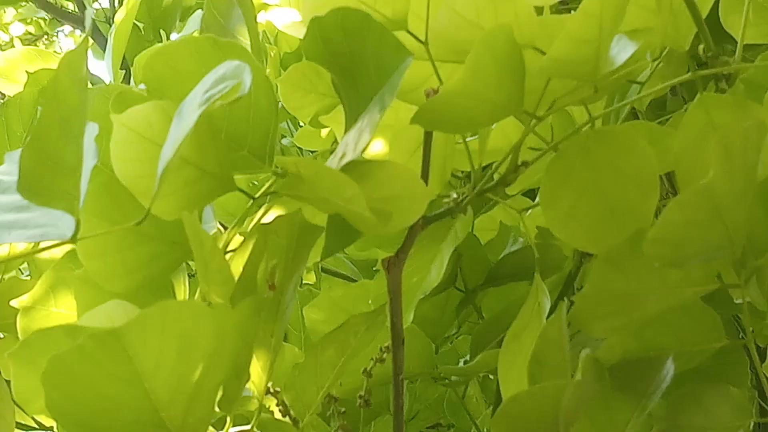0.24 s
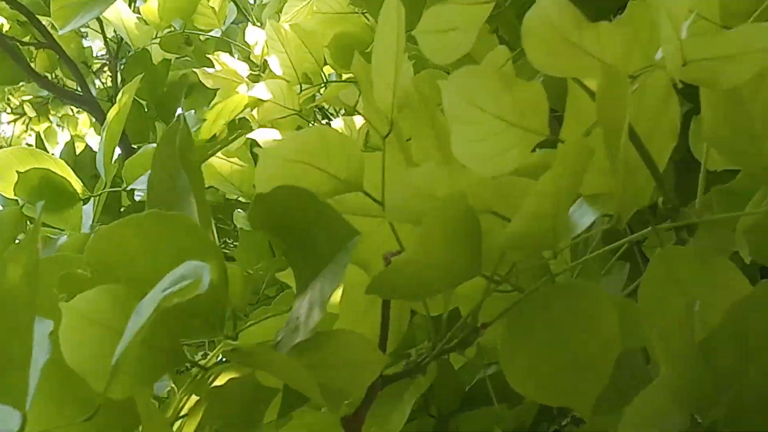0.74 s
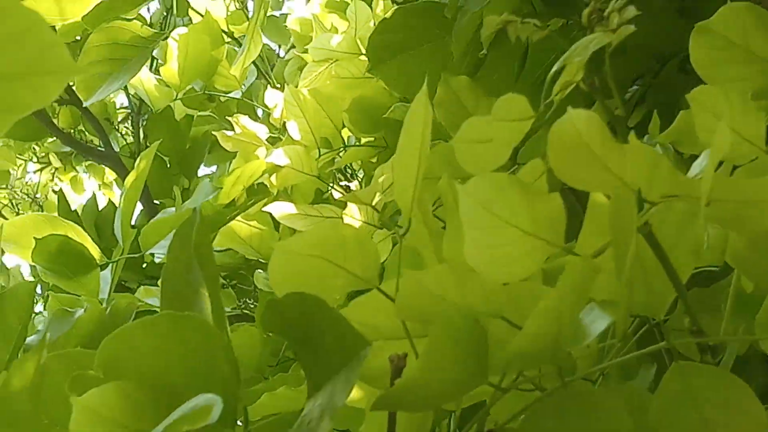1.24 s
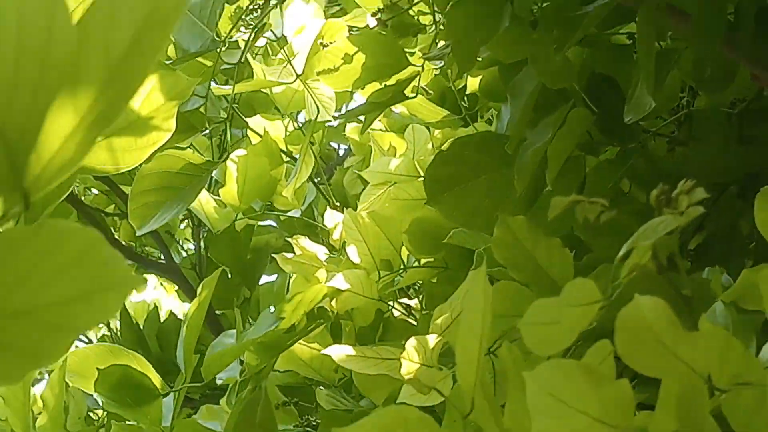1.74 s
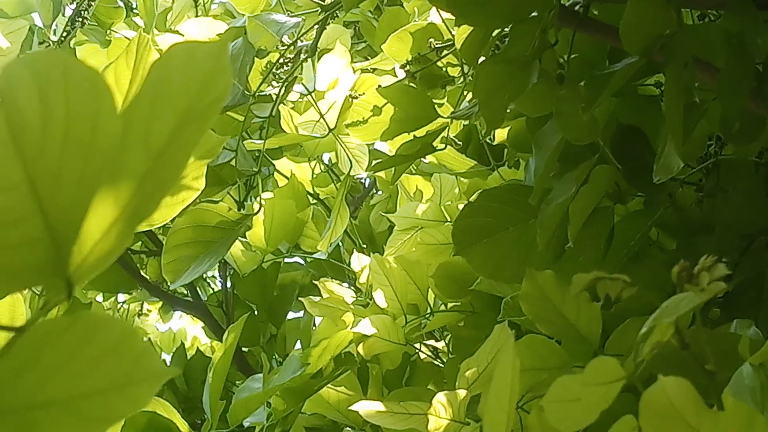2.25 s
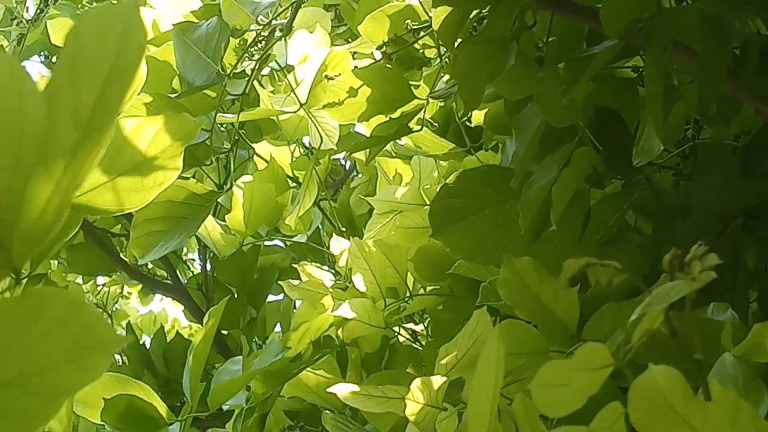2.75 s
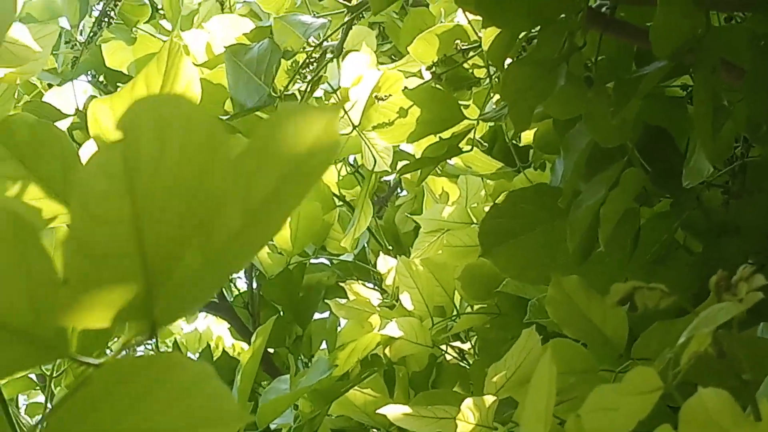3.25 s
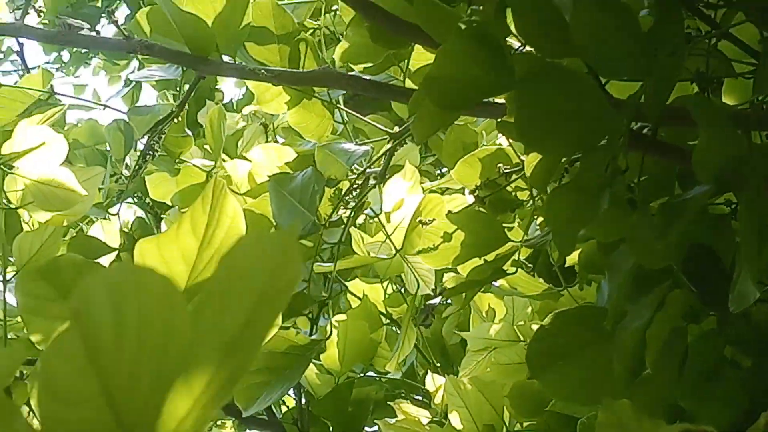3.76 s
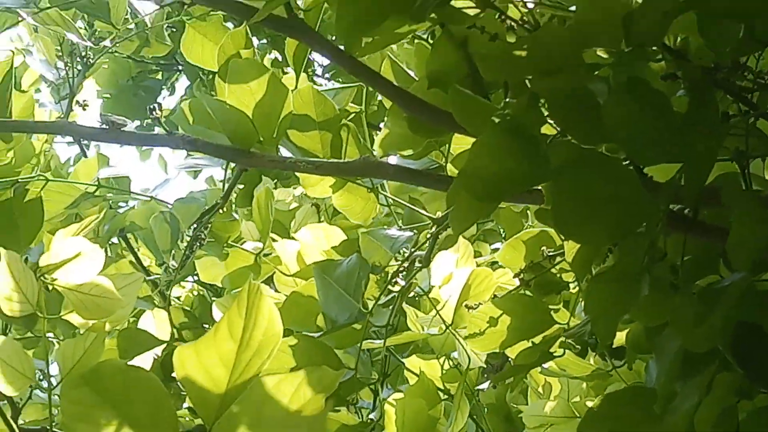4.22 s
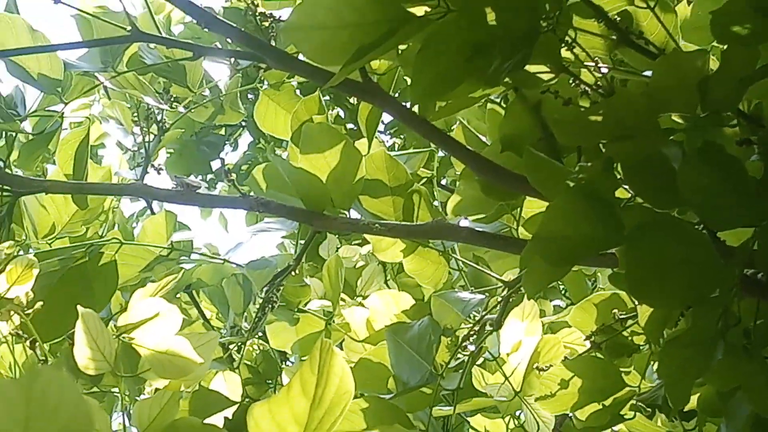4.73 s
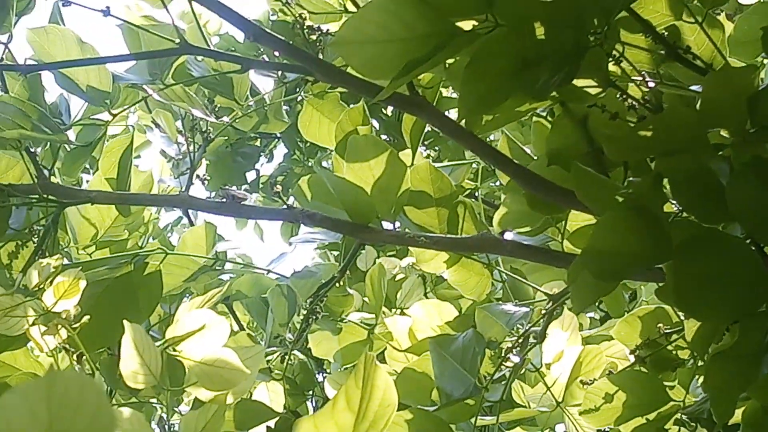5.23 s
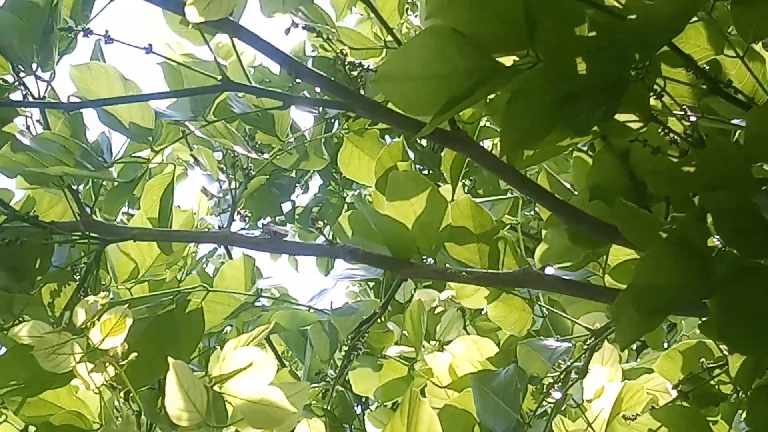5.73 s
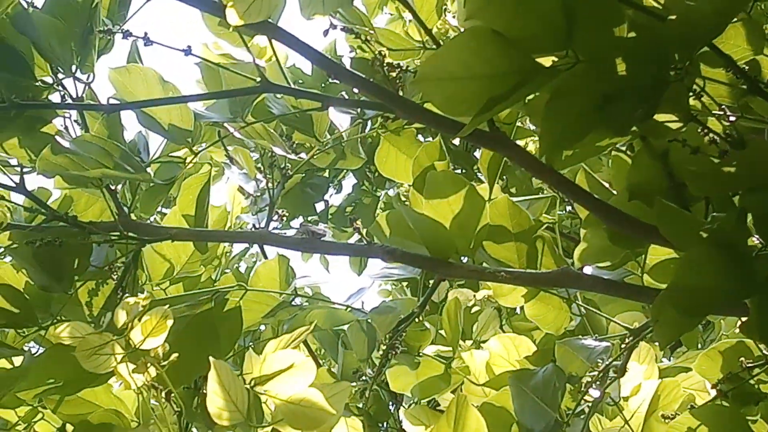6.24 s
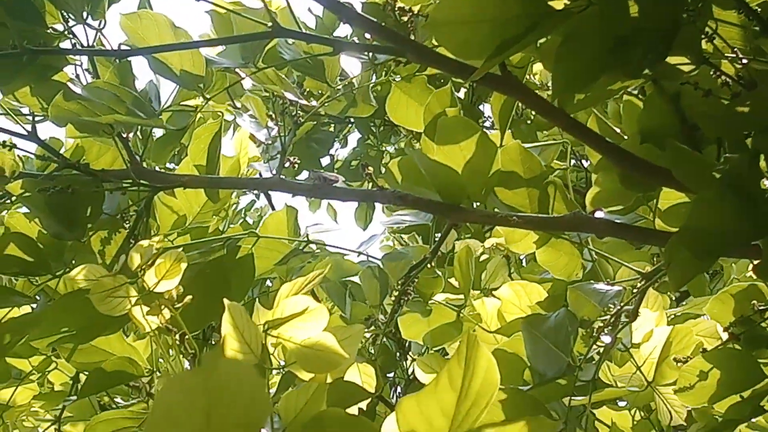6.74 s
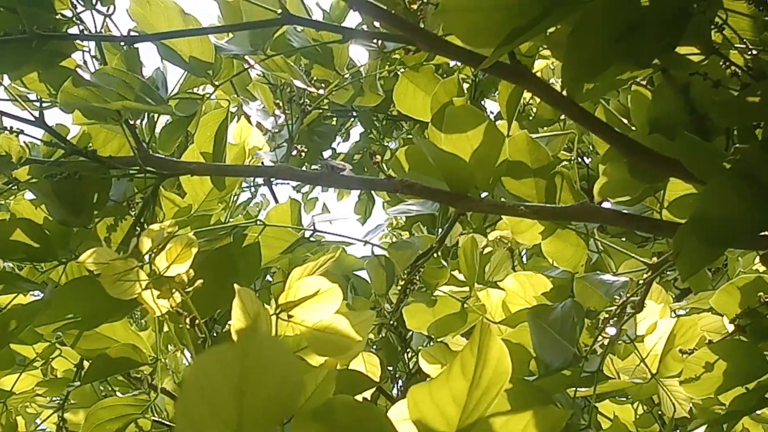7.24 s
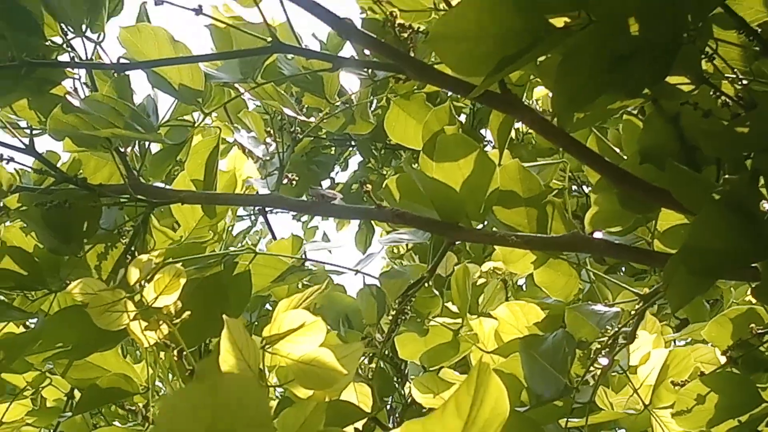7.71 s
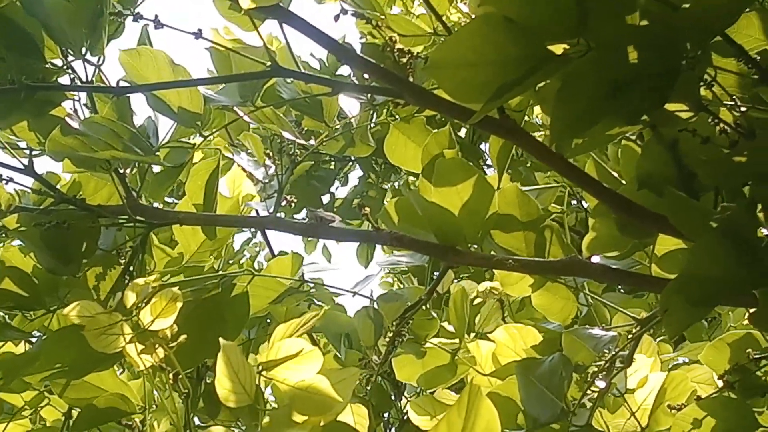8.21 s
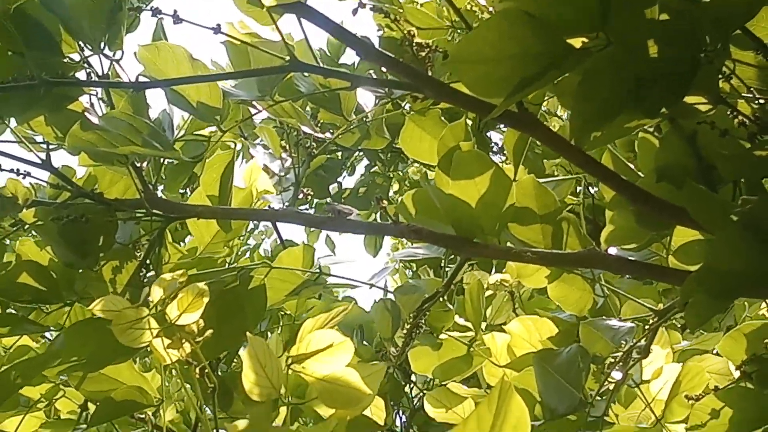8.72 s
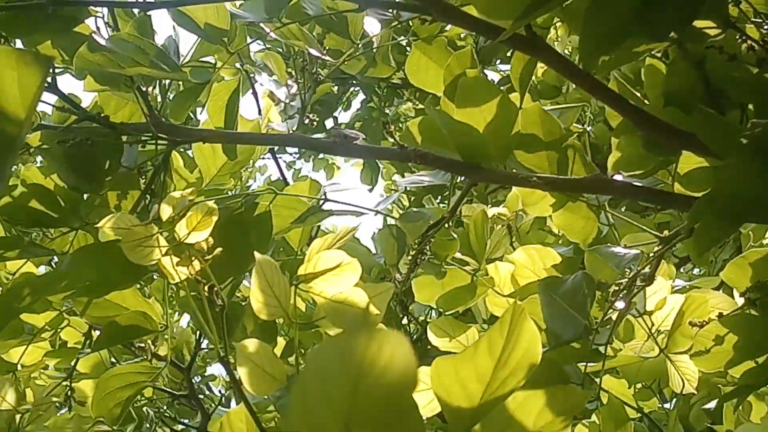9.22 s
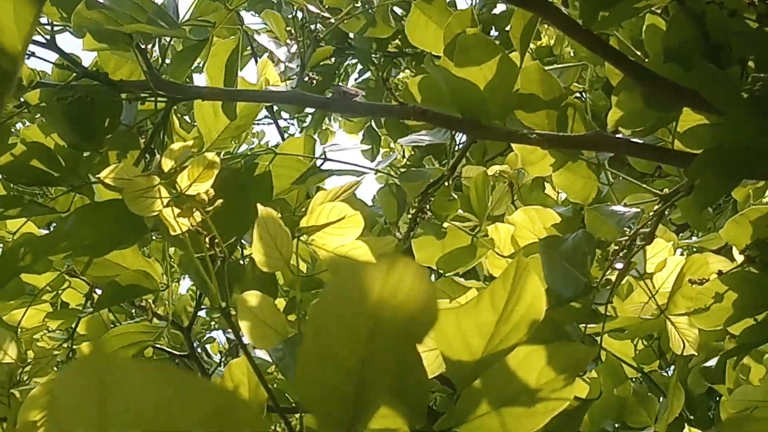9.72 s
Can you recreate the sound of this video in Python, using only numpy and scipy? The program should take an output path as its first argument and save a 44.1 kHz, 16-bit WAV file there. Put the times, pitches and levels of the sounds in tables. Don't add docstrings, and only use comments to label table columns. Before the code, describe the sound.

A close handheld microphone among trees catches one continuous, piercing cicada buzz with a fast, rough flutter, dominating from start to finish. Early on, deep wind puffs thud beneath it; later the low end is quiet apart from light sleeve rubs. Small dry clicks of leaves, duller wooden knocks and thin twig snaps scatter irregularly. Far behind lie soft traffic wash, faint hoots and early bird whistles. A finger taps the case at the end.

```python
import sys
import numpy as np
from scipy import signal
from scipy.fft import rfft, irfft, next_fast_len
from scipy.io import wavfile
from scipy.ndimage import uniform_filter1d

SR = 44100
rng = np.random.default_rng(int(sys.argv[2]) if len(sys.argv) > 2 else 0)


def output_pcm(signal):
    pcm = np.clip(np.atleast_2d(signal).T, -1, 1) * 32767
    wavfile.write(sys.argv[1], SR, np.round(pcm).astype(np.int16))


def attenuation_scalar(level_db):
    decades = np.asarray(level_db, float) / 20
    return 10 ** decades


N = 439677

# [f/Hz, density/dB per Hz]
AIR_SPECTRUM = [(15, -44), (25, -14), (92, 2), (147, -4.5), (201, -0.5), (280, -5), (1060, -7.5),
                (1580, -13), (2200, -7.5), (2570, -10.5), (2940, -6), (4010, -9), (5000, -2), (6500, -31),
                (11000, -120)]
# [t/s, length/s, f/Hz, level/dB]
HOOTS = [(1.82, 0.17, 520, -59), (2.095, 0.13, 2400, -55.5), (2.5, 0.16, 500, -59.5),
         (2.516, .12, 747, -61), (2.932, 0.28, 679, -60.5), (3.047, 0.33, 343.5, -55),
         (6.479, .16, 690, -62), (8.37, 0.15, 440, -57), (8.49, 0.29, 714, -62), (1.478, .06, 2550, -58)]
# [t/s, level/dB]
CHIRPS = [(1.42, -64), (1.7, -63), (1.97, -61), (2.22, -62), (2.46, -64), (2.7, -65)]
# [peak t/s, level/dB, time to fall 10 dB/s]
GUSTS = [(.055, -25.5, 0.07), (.225, -25, 0.06), (.33, -29.5, .07), (.49, -34.5, 0.1), (.7, -30.5, 0.05),
         (.84, -21, 0.07), (.94, -19, 0.13), (1.03, -18, 0.0843), (1.14, -24, .07), (1.23, -31, 0.02),
         (1.39, -39.5, -0.1), (2.53, -35, 0.06), (2.75, -32.5, 0.1), (2.86, -32.5, 0.13), (3.01, -42, 0.02),
         (3.14, -45, 0.2), (3.33, -49, 0.5), (3.48, -43.5, 0.15), (3.61, -43, 0.1)]
# [peak t/s, level/dB, time to fall 10 dB/s]
SLEEVE = [(3.11, -52, 0.2), (3.33, -48.5, 0.25), (3.54, -46, 0.17), (3.78, -39.5, 0.16), (3.98, -49, 0.3),
          (4.385, -50, 0.1), (4.62, -49, 0), (7.545, -50, 0.1), (7.62, -56, .02), (9.901, -42.5, 0.2)]
# [t/s, peak level/dB, f/Hz, share of snap]
LEAF_TICKS = [(0.1855, -25, 2190, 0.7), (0.562, -18, 3050, 0.7), (0.6281, -19, 2640, 0.63),
              (0.761, -22, 3940, 0.5), (0.9216, -19, 2160, 0.7), (2.283, -21.5, 3100, 0.48),
              (2.6179, -22, 2750, 0.61), (3.1976, -21, 2920, 0.38), (3.4034, -20, 4460, 1),
              (3.551, -19, 2900, 0.7), (3.643, -24, 2200, 0.98), (4.9555, -19, 3000, 0.39),
              (5.156, -24, 3130, 0.44), (5.254, -21, 2500, 1), (5.4296, -25, 3140, 0.53),
              (6.0313, -21, 2950, 0.32), (6.222, -18.5, 2800, 0.45), (6.364, -18.5, 2920, 0.81),
              (6.494, -21.5, 2050, 0.7), (6.544, -19, 3350, 0.61), (6.6288, -15.5, 3560, 0.64),
              (6.9631, -23, 2780, 0.7), (7.046, -16, 2160, 0.58), (7.393, -22, 3190, 0.63),
              (7.9483, -20.5, 2980, 0.99), (8.0965, -24, 3810, 0.95), (8.906, -21, 2920, 0.61),
              (9.1378, -20.5, 4000, 0.87), (9.1773, -21, 2290, 0.7), (9.616, -22, 2150, 0.48)]
# [t/s, peak level/dB, f/Hz]
KNOCKS = [(1.955, -35, 999), (2.09, -33, 1010), (2.175, -32, 1170), (4.813, -31, 770), (5.575, -39, 1100),
          (6.849, -34, 786), (7.376, -31, 618), (7.639, -28, 1160), (8.007, -30, 1150)]
# [t/s, peak level/dB]
TWIG_SNAPS = [(.562, -22), (1.25, -23), (2.245, -20), (5.256, -20), (6.627, -27), (7.446, -15),
              (9.178, -18)]
# (t/s, peak level/dB, duration/ms)
FINGER_TAP = (9.7955, -11.5, 0.42)
# [t/s, jump/cycles per s]
SURGES = [(-.3, 1), (.16, 1.6), (.58, .8), (1.02, 2.8), (1.61, 1), (2.19, .8), (2.59, .5), (2.96, 2.2),
          (3.22, 1.9), (3.65, .6), (4.1, 1), (4.82, 2.5), (4.94, 1.6), (5.5, .8), (6.28, 1.3), (6.57, .9),
          (7.06, 1), (7.35, 1.2), (7.58, 1.4), (8.1, .8), (8.98, .6), (9.17, 1.2)]
# [delay/ms, favoured f/Hz, level/dB]
RIBS = [
    (0, 7300, 0.5),
    (0.549, 8400, -9),
    (1.152, 8400, -12),
    (1.797, 8850, -3),
]
# [f/Hz, density/dB per Hz]
BODY = [(2470, -53), (4200, -28), (4980, -41), (5250, -12.5), (5770, -14.5), (6540, -11.5), (7100, -8.5),
        (8180, 4), (8640, -5), (9580, -11), (10200, -18), (12700, -25), (14800, -25), (15500, -37.5)]
# [f/Hz, width/Hz, lift/dB]
RINGS = [(5070, 77, -8), (6415, 390, 10), (6500, 120, -5), (6903, 140, 13.5), (7300, 250, 8.5),
         (7940, 280, 9), (8400, 550, 7.5), (8868, 175, 11.5), (10000, 370, 8), (10520, 210, 9),
         (10800, 133, 12.5), (11500, 230, 7), (12370, 150, 8.5), (13600, 790, -2), (14200, 250, 3),
         (14600, 300, 9), (15250, 250, 8), (15500, 320, 11)]
# [t/s, nearness/dB, facing/dB, place of second membrane/cycles]
MIC_PATH = [(0, -3, -1, 0.43), (.55, -2.5, 3.5, 0.44), (1.0, -4.5, 5.5, 0.44), (1.6, -3, -2, 0.42),
            (1.9, -4.5, -2, 0.44), (2.8, -2.5, -3, 0.47), (3.3, 1.5, -3.3, 0.44), (3.65, 1.7, -3, 0.48),
            (3.85, 2.5, 1.5, .53), (4.5, 0, 1, 0.44), (4.9, 3, 1, 0.47), (5.6, -1.5, 1, .45),
            (6.2, 0, 0.5, .45), (6.4, 3.5, 2.5, 0.47), (7.3, 0.3, 0.5, .45), (8.2, 3, .4, 0.48),
            (8.9, 0.5, 1.4, .43), (9.9, 0.4, -3, .5)]
# [level/dB, share of nearness, share of facing]
SONG_PARTS = [
    (-36.5, 0.47, 0.38),
    (-21, 0.54, -0.63),
    (-18, 0.4, -0.29),
    (-18.5, 0.18, 0.44),
    (-32, 0.47, -.09),
]


def read(points, hz):
    f, value = np.transpose(points)
    return np.interp(np.log(hz + 1), np.log(f + 1), value)


def evened(x):
    return x / np.sqrt(np.mean(x ** 2) + 1e-20)


def smooth_twice(x, size):
    return uniform_filter1d(uniform_filter1d(x, size=size), size=size)


def step_up(hz, at_hz, width_hz):
    return 1 / (1 + np.exp((at_hz - hz) / width_hz))


def drift(t, top_hz, count):
    f = np.geomspace(top_hz / 20, top_hz, num=12)[:, None, None]
    phase = rng.random((12, count, 1))
    return np.sin(2 * np.pi * (f * t + phase)).sum(axis=0) / np.sqrt(6)


def clicks(seconds, sizes):
    at, near = seconds * SR + 16, np.arange(-8, 9)
    offset = near - (at % 1)[:, None]
    pulse = sizes[:, None] * np.sinc(offset) * np.cos(np.pi * offset / 20) ** 2
    places = at.astype(int)[:, None] + near
    return np.bincount(places.ravel(), pulse.ravel(), N + SR)[16:N + 16]


def shaped(points):
    size = next_fast_len(N)
    gain = attenuation_scalar(read(points, np.fft.rfftfreq(size, 1 / SR)))
    return evened(irfft(rfft(rng.standard_normal(size)) * gain, size)[:N])


def add(mix, s, sound):
    part = mix[round(s * SR):][:len(sound)]
    part += sound[:len(part)]


def air():
    hum_hz, hum_db, air_db, gusty_db = 101, -56, -40.5, 4.0
    slow = np.arange(0, N + 441, 441) / SR
    t = np.arange(N) / SR
    swell, waver, throb, stir = (np.interp(t, slow, c) for c in drift(slow, 16, count=4))
    hum = attenuation_scalar(hum_db + 2.0 * throb) * np.sin(2 * np.pi * np.cumsum(hum_hz + 2.3 * waver) / SR)
    wash = shaped(AIR_SPECTRUM)
    traffic = signal.sosfiltfilt(signal.butter(2, 1600, fs=SR, output="sos"), wash)
    hiss = attenuation_scalar(gusty_db * np.tanh(stir) - 1.0) * (wash - traffic)
    return attenuation_scalar(air_db - 1.5) * (attenuation_scalar(0.83 * swell) * traffic + hiss) + hum


def horns():
    out = np.zeros(N)
    for s, length, hz, db in HOOTS:
        t = np.arange(round(length * SR)) / SR
        add(out, s, attenuation_scalar(db + 12) * np.sin(2 * np.pi * hz * t) * signal.windows.tukey(len(t), .5))
    return out


def bird():
    low_hz, high_hz, chirp_s = 4150, 4980, .14
    out, u = np.zeros(N), np.linspace(0, 1, round(chirp_s * SR))
    for s, db in CHIRPS:
        hoarse_hz = 2000 * uniform_filter1d(rng.standard_normal(len(u)), size=150)
        hz = low_hz + (high_hz - low_hz) * np.sin(np.pi / 2 * u) + hoarse_hz
        whistle = np.sin(2 * np.pi * np.cumsum(hz) / SR) * np.sin(np.pi * u) ** .7
        add(out, s, attenuation_scalar(db + 12) * whistle)
    blur = rng.standard_normal(3000) * np.exp(-np.arange(3000) / SR / .02)
    return out + 3.0 * signal.oaconvolve(out, blur / np.linalg.norm(blur))[:N]


def swells(t, rows):
    s, db, fall = np.transpose(rows)[:, :, None]
    u = (t - s) / np.maximum(fall, .01)
    rise_share = 0.85
    power = attenuation_scalar(db - 10 * np.maximum(u, -u / rise_share)) ** 2
    return 10 * np.log10(power.sum(axis=0) + 1e-12)


def wind():
    lumpy_db = 3.5
    frames, hz = N // 256 + 5, np.fft.rfftfreq(1024, 1 / SR)[:, None]
    t = np.arange(frames) * 256 / SR
    gust_db = swells(t, GUSTS)
    corner_hz = 145 * attenuation_scalar(0.32 * (np.maximum(gust_db, -60) + 32.5))
    gust = 1 / (1 + (hz / corner_hz) ** 3.74)
    gain = gust / np.sqrt((gust ** 2).sum(axis=0)) * attenuation_scalar(gust_db)
    rub = (hz / 300) ** 2.97 / (1 + (hz / 330) ** 5.0)
    gain += rub / np.linalg.norm(rub) * attenuation_scalar(swells(t, SLEEVE) - 1.0)
    a, b = rng.standard_normal((frames, 513, 2)).T
    rumble = signal.istft(gain * (a + 1j * b), nperseg=1024, noverlap=768)[1][:N]
    lumps = evened(smooth_twice(rng.standard_normal(N), 350))
    low_cut = signal.butter(3, 70, "high", fs=SR, output="sos")
    return signal.sosfilt(low_cut, attenuation_scalar(5.0 + lumpy_db * lumps) * rumble)


def tick(hz, cycles, snap):
    t = np.arange(900) / SR
    modes = np.sin(2 * np.pi * hz * t) + .3 * np.sin(2 * np.pi * 1.5 * hz * t)
    noise = uniform_filter1d(rng.standard_normal(len(t)), size=4)
    crack = signal.lfilter([1, -1], [1, -.8], noise) * np.exp(-t / 0.00087)
    return modes * np.tanh(t * hz / 2) * np.exp(-t * hz / cycles) + 2.1 * np.maximum(snap, 0) * crack


def crackle():
    per_s, level_db, spread_db, lift_db = 150.0, -50.5, 5.5, 12
    out = np.zeros(N)
    clumps = attenuation_scalar(6.0 * evened(uniform_filter1d(rng.standard_normal(N), 1400)))
    tick_db = level_db + spread_db * np.minimum(rng.exponential(1, N), 2.5)
    size = attenuation_scalar(tick_db) * (rng.random(N) < per_s / SR * clumps)
    leaf = rng.integers(0, 16, size=N)
    for k, hz in enumerate(np.geomspace(1400, 5000, num=16)):
        grain = tick(hz, cycles=5, snap=.15) * attenuation_scalar(lift_db / (1 + ((hz - 2700) / 900) ** 2))
        out += signal.oaconvolve(size * (leaf == k), grain)[:N]
    return out


def leaves():
    out = np.zeros(N)
    for s, db, hz, snap in LEAF_TICKS:
        add(out, s, attenuation_scalar(db - 0.5) * tick(hz, cycles=5, snap=snap))
    for s, db, hz in KNOCKS:
        add(out, s, attenuation_scalar(db) * tick(hz, cycles=5.8, snap=0.048))
    for s, db in TWIG_SNAPS:
        burst = signal.lfilter([1, -1], [1, -.7], rng.standard_normal(299))
        add(out, s, attenuation_scalar(db) * burst * np.exp(-np.arange(299) / SR / .0011))
    out += crackle()
    echo_s = np.r_[0, rng.uniform(.002, .02, 8)]
    echo_size = np.r_[1, .12 * rng.choice([-1., 1.], 8)]
    out = signal.oaconvolve(out, clicks(echo_s, echo_size)[:1000])[:N]
    tap_s, tap_db, tap_ms = FINGER_TAP
    u = np.arange(400) / SR / (0.00085 * tap_ms)
    add(out, tap_s, attenuation_scalar(tap_db) * (1 - u) * np.exp(-u) * np.tanh(7.1 * u))
    return out


def muscle(t):
    rest_hz, surge_s, sag_s, flutter_hz = 206.8, .06, .45, .25
    slow = t[::441]
    s, jump = np.transpose(SURGES)[:, :, None]
    rise = np.clip((slow - s) / surge_s + 1, 0, 1)
    lift = jump * rise * np.exp(-np.maximum(slow - s, 0) / sag_s)
    flutter = flutter_hz * drift(slow, 10, count=1)[0]
    return np.interp(t, slow, rest_hz + lift.sum(axis=0) + flutter)


def ring(gain_db):
    sweep_ms_per_khz = 0.27
    khz = np.fft.rfftfreq(4096, 1000 / SR) - 8
    sweep = np.exp(-1j * np.pi * sweep_ms_per_khz * khz ** 2)
    return np.roll(irfft(attenuation_scalar(gain_db) * sweep), 1024)[:2048] * np.hanning(2048)


def rib_snaps(beat, place, delay_ms, rib_db):
    wander_ms, shake_ms, uneven, second_db = .028, 0.007, 0.13, -1.5
    train = np.zeros(N)
    for start, side_db in ((0, 0), (place / 208, second_db)):
        wander = drift(beat, 0.5915, count=1)[0]
        shake, size = rng.standard_normal((2, len(beat)))
        late = 1e-3 * (delay_ms + wander_ms * wander + shake_ms * shake)
        train += clicks(np.maximum(beat + start + late, 0), attenuation_scalar(rib_db + side_db) * (1 + uneven * size))
    return train


def abdomen(beat, gain_db):
    between = (beat[1:] + beat[:-1]) / 2 + 1e-3 * .03 * drift(beat[1:], 1.5, count=1)[0]
    both = np.maximum(np.r_[beat, between], 0)
    strokes = clicks(both, np.r_[np.ones(len(beat)), np.full(len(beat) - 1, .65)])
    return evened(signal.oaconvolve(strokes, ring(gain_db), "same"))


def under_branch(song):
    bend_db, leaf_sway_db = -39.0, .7
    t, size = np.arange(N) / SR, next_fast_len(N)
    s, near_db, facing_db, _ = np.transpose(MIC_PATH)
    hz = np.fft.rfftfreq(size, 1 / SR)
    whole = rfft(song, size) + attenuation_scalar(bend_db) * rfft(song ** 2, size) * (hz > 12000)
    steps = [1] + [1 / (1 + np.exp((f - hz) / 60)) for f in (6550, 7600, 8200, 9500)] + [0]
    out = np.zeros(N)
    shade = leaf_sway_db * drift(t[::441], 6, count=5)
    for k, (db, near, facing) in enumerate(SONG_PARTS):
        band = irfft(whole * (steps[k] - steps[k + 1]), size)[:N]
        held = band / np.sqrt(smooth_twice(band ** 2, 6000))
        path_db = np.interp(t, s, db + near * near_db + facing * facing_db)
        out += attenuation_scalar(path_db + np.interp(t, t[::441], shade[k])) * held
    return out


def cicada():
    slip_ms, rasp_db, thrum_db = 0.024, -9, -23.0
    t, hz = np.arange(N) / SR, np.fft.rfftfreq(4096, 1 / SR)
    s, _, _, place = np.transpose(MIC_PATH)
    beat = np.interp(np.arange(2070), np.cumsum(muscle(t)) / SR, t)
    beat = beat + 0.00093 * slip_ms * np.convolve(rng.standard_normal(len(beat)), np.hanning(7), "same")
    body_db = read(BODY, hz) + sum(db / (1 + (2 * (hz - f) / w) ** 2) for f, w, db in RINGS)
    below = 1 - step_up(hz, 6550, 100)
    song = np.zeros(N)
    for delay_ms, rib_hz, db in RIBS:
        train = rib_snaps(beat, np.interp(beat, s, place), delay_ms, db)
        favour_db = 6.8 / (1 + ((hz - rib_hz) / 500) ** 2) - 10 * below
        song += signal.oaconvolve(train, ring(body_db + favour_db), "same")
    echoes = clicks(np.r_[0, .0008, .0016, .0031, .0056], np.r_[1, .25, -.3, .3, .3])[:400]
    song = evened(signal.oaconvolve(song, echoes)[:N])
    song += attenuation_scalar(rasp_db) * evened(signal.oaconvolve(rng.standard_normal(N), ring(body_db), "same"))
    song += attenuation_scalar(thrum_db) * abdomen(beat, body_db - 40 * (1 - below))
    return under_branch(song)


def scene():
    return np.tile(air() + horns() + bird() + wind() + leaves() + cicada(), (2, 1))


def top_cut(x):
    return signal.sosfilt(signal.butter(12, 16700, fs=SR, output="sos"), x)


def record(dry):
    end_s, fade_s, edge_hz = 9.919, 0.00067, 15730
    open_gate = np.clip((end_s - np.arange(N) / SR) / fade_s, 0, 1)
    edge = signal.firwin(1023, edge_hz, window=("kaiser", 9), fs=SR)
    mix = signal.oaconvolve(dry * open_gate, edge[None], "same")
    return top_cut(mix)


dry = scene()
out = record(dry)
output_pcm(out)
```